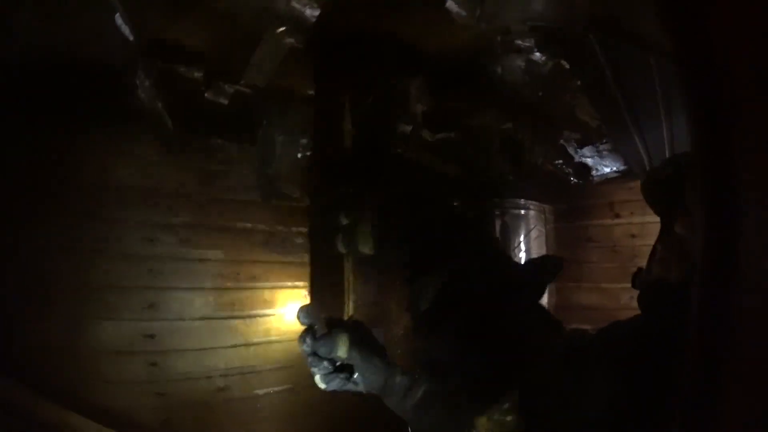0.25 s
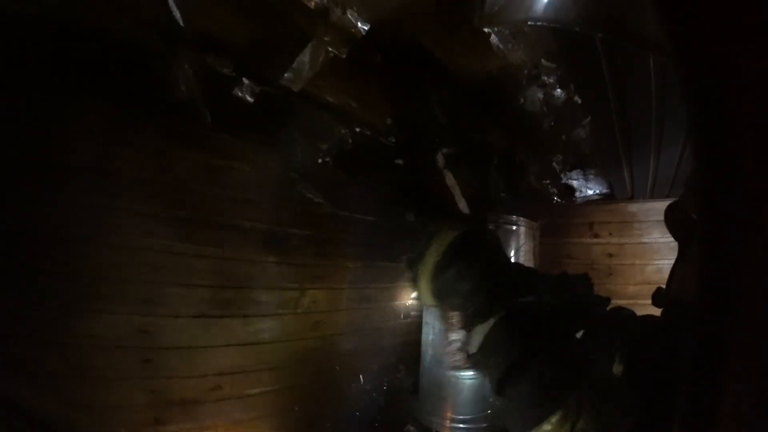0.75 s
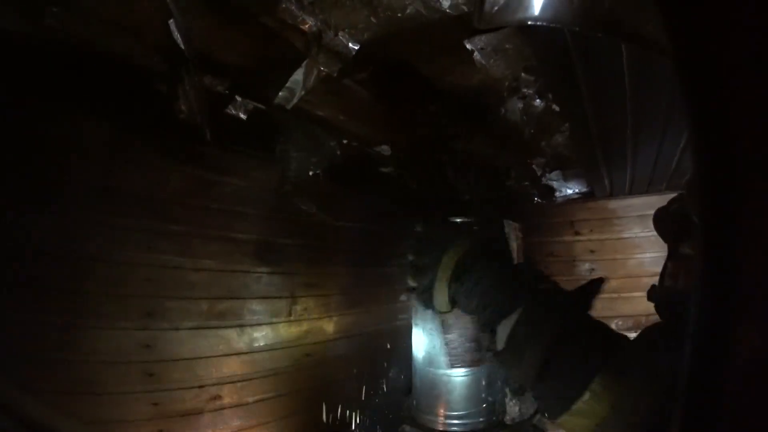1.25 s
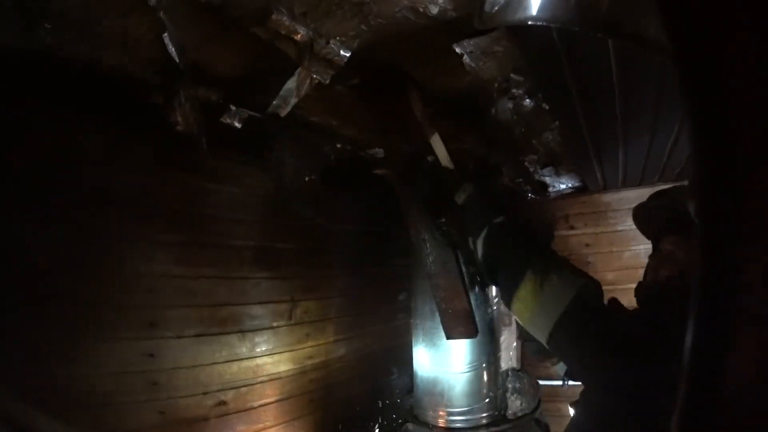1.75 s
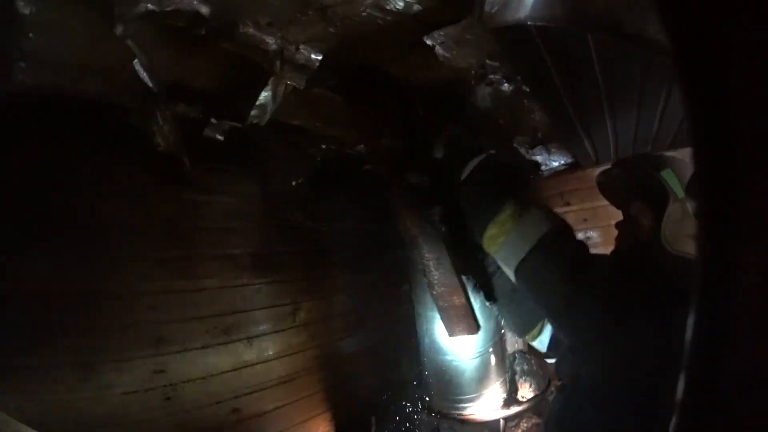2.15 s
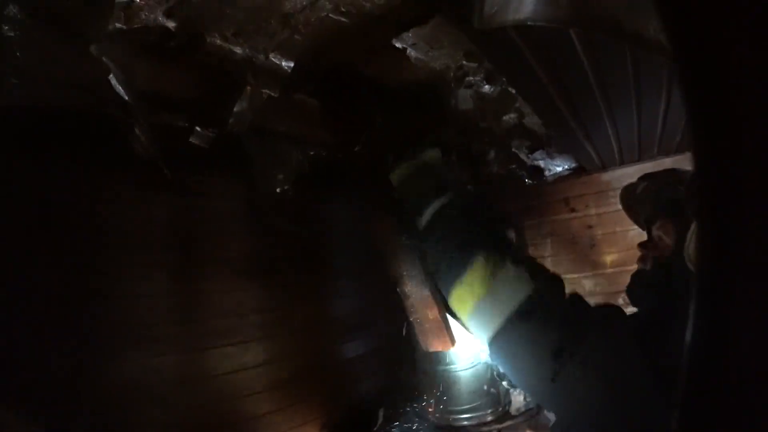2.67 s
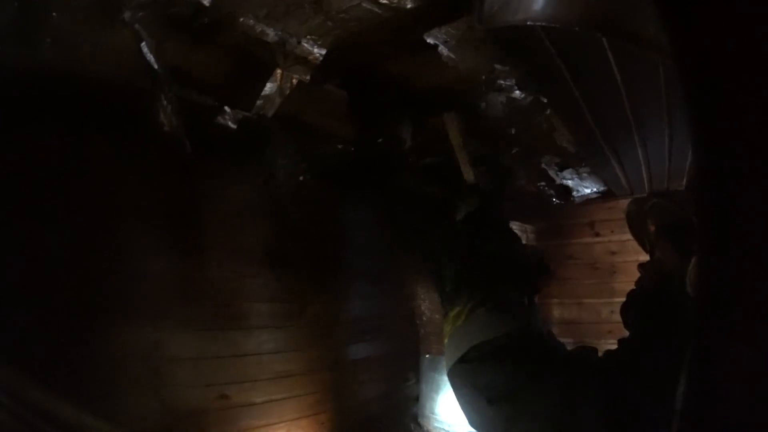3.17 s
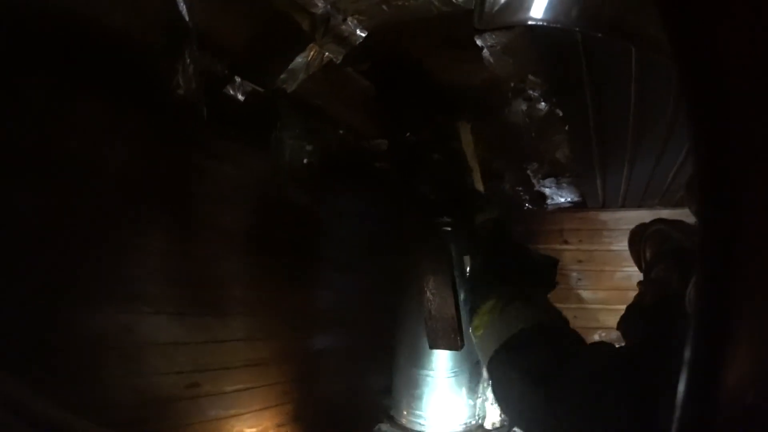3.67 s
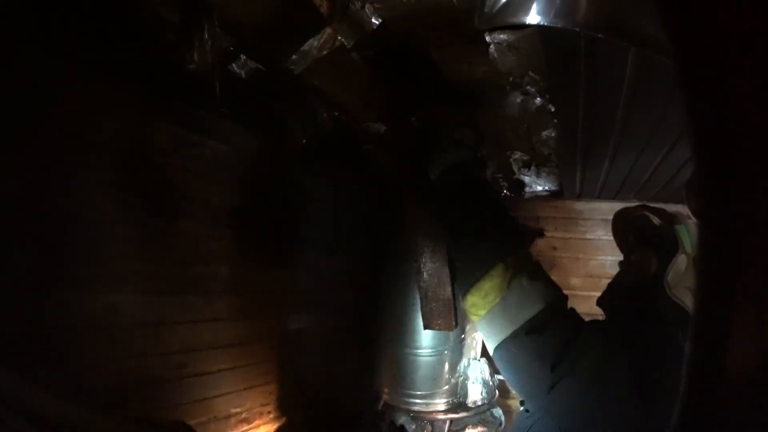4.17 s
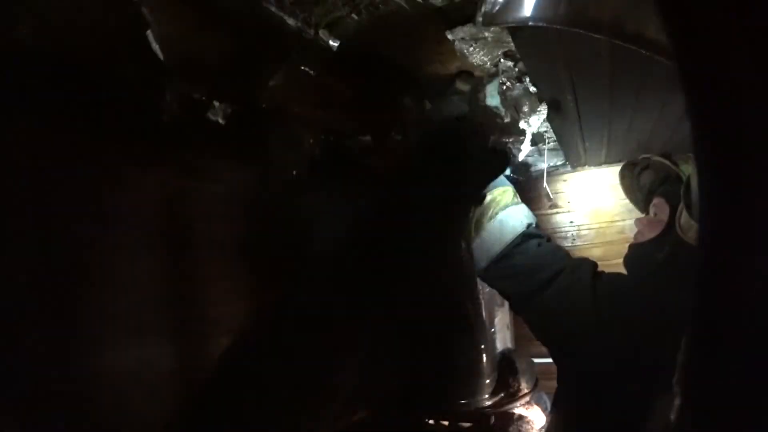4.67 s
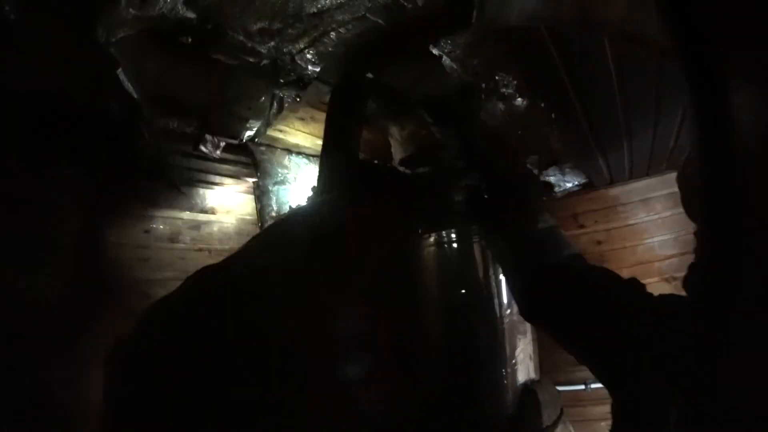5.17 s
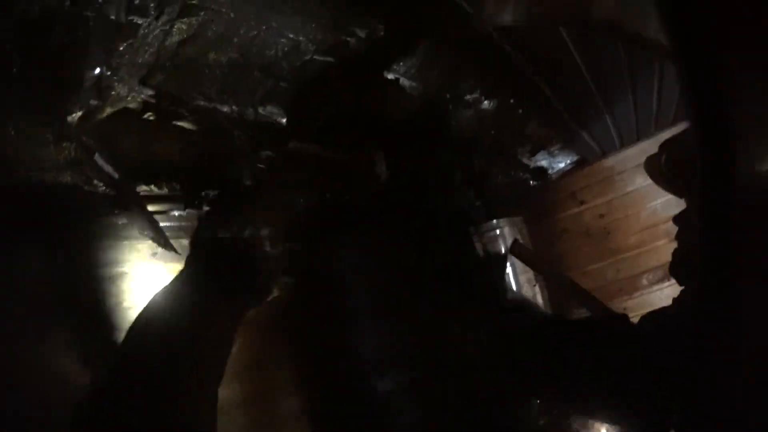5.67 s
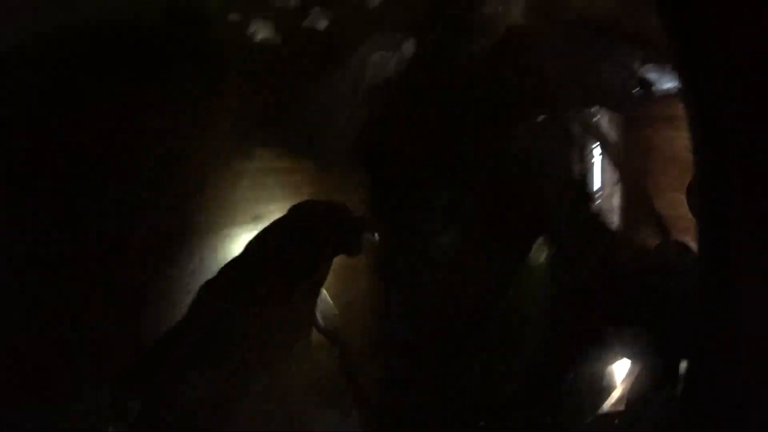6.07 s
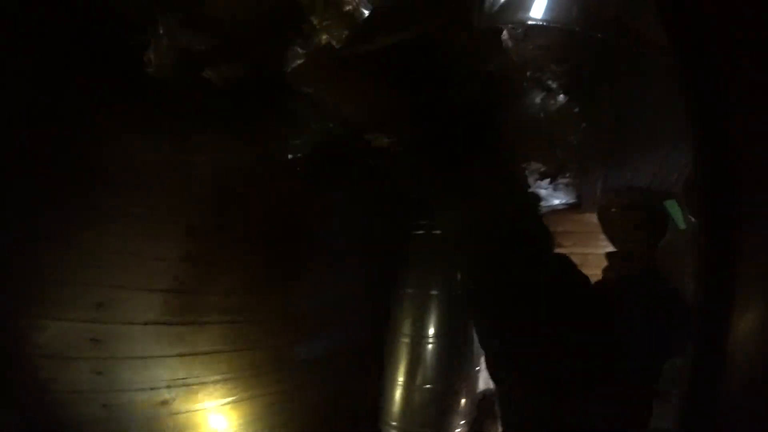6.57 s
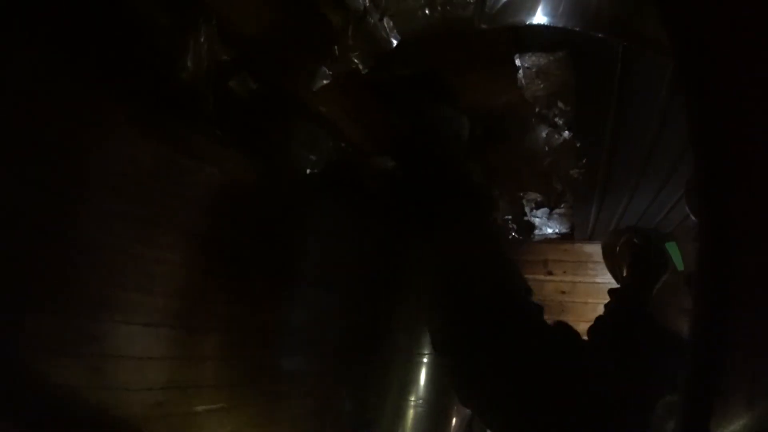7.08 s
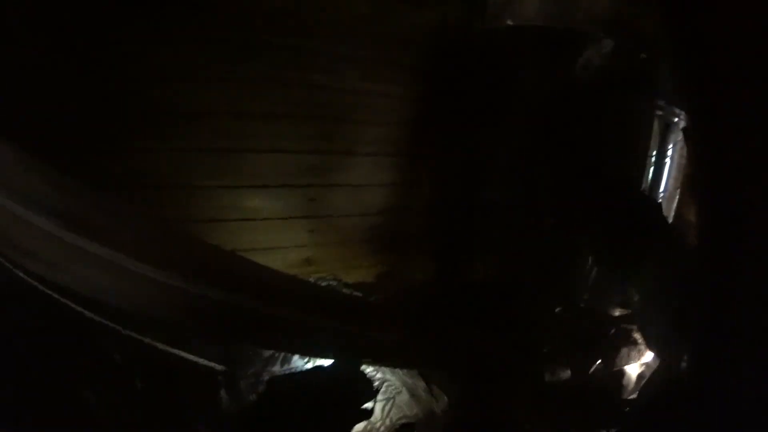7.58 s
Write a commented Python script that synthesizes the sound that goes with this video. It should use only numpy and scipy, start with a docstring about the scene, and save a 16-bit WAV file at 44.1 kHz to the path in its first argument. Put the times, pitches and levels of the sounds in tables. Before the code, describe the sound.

In a small wood-lined room, heard from very close in stereo, heavy clothing rustles and fine grit trickles over a very faint low rumble. From 0 to 1 s, sharp splinter snaps, short tears and several moderate hollow axe knocks come quickly. Between 1 and 3 s it is sparser: cloth swishes, tiny cracks, a few soft muffled knocks. Around 3.4 and 3.8 s wood crackles and scrapes again, then a strong deep thump with a snap hits at 4.06 s. After a short lull, bright snaps gather from 4.7 s, with loud splintering at 5.1 to 5.5 s and the heaviest double blow at 5.6 s. From 5.95 to 7 s, clattering knocks, rasping tears and ticking chips crowd together with louder rustling. It then thins to one weak knock at 7.3 s and a brief tear near 7.8 s. Each wood sound has close early echoes and a quick, dense tail.

```python
"""Heavy clothing rustles and grit trickles over a faint rumble, while wood snaps, tears and is knocked with an axe
throughout. A worker pries at the nailed boards of a ceiling in a small wood-lined room, heard from close by.
Rustling is many tiny random contacts; snaps are very short noise bursts; tears are clumps of tiny jerks.
Knocks add the decaying notes of joists and boards to a clattering contact and a short hollow tock.
Early echoes and a dense, fading room tail follow every wood sound."""
import sys
import numpy as np
from scipy import signal
from scipy.fft import next_fast_len
from scipy.io import wavfile
from scipy.ndimage import uniform_filter1d

SR = 44100
rng = np.random.default_rng(int(sys.argv[2]) if len(sys.argv) > 2 else 0)


def inscribe(sig):
    """Save sig as 16-bit PCM at rate SR to the path in sys.argv[1].

    A 1-D sig is mono; a 2-D sig holds one channel per row.
    Samples are clipped to [-1, 1] before scaling.
    """
    pcm = np.round(np.clip(np.atleast_2d(sig).T, -1, 1) * 32767)
    wavfile.write(sys.argv[1], SR, pcm.astype(np.int16))


N = 345303  # length in samples


def amp(db):
    """Turns decibels into a plain multiplier."""
    return 10 ** (np.asarray(db) / 20)


def rms(x):
    """The average strength of a sound, kept just above zero so that we can divide by it."""
    return np.sqrt(np.mean(x ** 2) + 1e-20)


def read(points, hz):
    """A spectrum's value at hz; the frequency axis is logarithmic, as pitch is to the ear."""
    f, value = np.transpose(points)
    return np.interp(np.log(hz + 1), np.log(f + 1), value)


def along(curve, s, column=1):
    """The value at time s of a curve that changes over time."""
    points = np.transpose(curve)
    return np.interp(s, points[0], points[column])


def add(mix, s, sound):
    """Adds a stereo sound to the mix at time s, cut off at the end of the mix."""
    part = mix[:, max(round(s * SR), 0):][:, :sound.shape[1]]
    part += sound[:, :part.shape[1]]


def response(points, size=4096):
    """The short click that carries a colour: its energy comes as early as the colour allows."""
    log_gain = np.log(amp(read(points, abs(np.fft.fftfreq(size, 1 / SR)))))
    spectrum = np.exp(np.conj(signal.hilbert(log_gain)))
    return np.fft.ifft(spectrum).real[:size // 2]


def colour(x, points):
    """Filters a sound so that its bass, middle and treble follow the colour's levels."""
    return signal.fftconvolve(x, response(points))[:len(x)]


def grains(n, per_s, spread_db, largest=4):
    """Tiny fractures or contacts at random moments; with a positive spread a few are much larger than the rest."""
    chance, size, sign = rng.random(n), rng.exponential(1, n), rng.choice([-1, 1], n)
    happens = chance < per_s / SR
    return happens * sign * amp(spread_db * np.minimum(size, largest))


def ports(x, side_db):
    """Two ears: side_db makes the left louder; the left also leads in phase, more so beyond 1 dB to its side."""
    z = signal.hilbert(x, next_fast_len(len(x)))[:len(x)]
    lead = .25 + .16 * max(side_db - 1, 0)  # radians
    turn = np.exp(.5j * lead) * amp(side_db / 2)
    return np.array([(z * turn).real, (z / turn).real])


def rub(level_db, points, per_s, spread_db, flutter_db, apart, side_db):
    """Many small contacts under a level that flutters as cloth folds and slides."""
    flutter = uniform_filter1d(rng.standard_normal(N), size=900)
    flutter = uniform_filter1d(flutter, size=500)
    drive = amp(flutter_db * flutter / rms(flutter))
    near, wide = (colour(grains(N, per_s, spread_db) * drive, points) for _ in range(2))
    centre = ports(near / rms(near), side_db)
    sides = apart * np.array([[1], [-1]]) * wide / rms(wide)  # opposite left and right: sounds wide
    return amp(level_db) * (centre + sides)


# Clothing and grit as the worker moves, before the gains in rustle: [t/s, swish level/dB, low body level/dB]
CLOTH_MOVES = [(0.0, -39.5, -44.5), (0.5, -42, -52), (0.67, -39, -42), (1.26, -44, -53.5),
               (1.63, -50.5, -57), (2.09, -44.5, -50.5), (2.2, -48, -53), (3.05, -44.5, -53.5),
               (3.62, -52, -59), (3.81, -49.5, -55), (3.97, -43, -46.5), (4.14, -50.5, -49.5),
               (4.4, -45, -51), (4.78, -35.5, -46.5), (5.19, -39, -53), (5.49, -34.5, -41),
               (5.63, -40.5, -43), (5.89, -40.5, -40.5), (6.15, -35, -30.5), (6.3, -41.5, -43),
               (6.52, -37.5, -43.5), (6.76, -40.5, -33), (7.13, -42.5, -49.5), (7.83, -46.5, -51.5)]
# Colour of the high swish: [f/Hz, level/dB]
SWISH_COLOUR = [(500, -34), (1800, -39), (3000, -7.5), (4200, 0), (6400, 4), (7800, -0.5), (11000, -6)]
# Colour of the low, soft part of the cloth sound: [f/Hz, level/dB]
CLOTH_BODY_COLOUR = [(20, -23), (45, -8.5), (80, -8.5), (140, -4.5), (210, -6.5), (300, -0.5), (350, -2),
                     (450, -20), (800, -20.5), (2000, -45)]
# Colour of the rubbing, also that of boards scraping in a tear: [f/Hz, level/dB]
RASP_COLOUR = [(300, -34.5), (480, -2.5), (600, -1), (900, -1), (1230, 2), (1500, 0), (1880, 1),
               (2300, -3.5), (3000, -0.5), (4500, -12.5), (10000, -25)]


def rustle(swish_gain_db=-0.5, body_gain_db=2.0, rub_gain_db=-3, rub_weight=0.29):
    """Clothing swishes high, rubs in the middle and rustles softly low, while grit trickles from the ceiling."""
    t = np.arange(N) / SR
    swish_db, body_db = along(CLOTH_MOVES, t), along(CLOTH_MOVES, t, column=2)
    # the rubbing follows both levels; rub_weight is the share that follows the body
    rub_db = swish_db + rub_weight * (body_db - swish_db) + rub_gain_db
    swish = rub(swish_db + swish_gain_db, SWISH_COLOUR, per_s=9000, spread_db=1.5,
                flutter_db=2.5, apart=0.4, side_db=0.0)
    rubbing = rub(rub_db, RASP_COLOUR, per_s=5000, spread_db=-0.5,
                  flutter_db=2.66, apart=0.67, side_db=-1.0)
    body = rub(body_db + body_gain_db, CLOTH_BODY_COLOUR, per_s=2700, spread_db=3.0,
               flutter_db=1.6, apart=.12, side_db=1.05)
    return swish + rubbing + body


def rumble(db=-62):
    """A faint, steady low rumble: random noise with little treble, different in each ear."""
    low = [(15, 6), (45, -11), (120, -15.0), (300, -4), (900, -59)]  # f/Hz, level/dB
    x = np.array([colour(rng.standard_normal(N), low) for _ in range(2)])
    return amp(db) * x / rms(x)


def small_snaps(per_s=5.2, above_db=15, spread_db=0.5):
    """Lesser fibres break at random moments, louder while the worker moves more: [t/s, level/dB]."""
    draws = rng.random((200, 2))[:round(per_s * N / SR)]
    s = draws[:, 0] * N / SR
    level_db = along(CLOTH_MOVES, s) + above_db + spread_db * (2 * draws[:, 1] - 1)
    return list(zip(s, level_db))


# The loudest splinters snapping, peaks before the gain in snaps: [t/s, level/dB]
LOUD_SNAPS = [(.0584, -19.5), (.113, -14.5), (.168, -11.5), (.2769, -18), (.2962, -14.5), (.3855, -18.5),
              (.598, -20), (2.605, -31), (2.7819, -20.5), (2.8799, -30), (2.9476, -24), (3.054, -21),
              (3.418, -12), (3.4444, -18), (4.0579, -8.5), (4.4192, -25), (4.6559, -13.5), (4.6643, -15),
              (4.8193, -10.5), (4.9392, -15.5), (4.9724, -17.5), (5.1118, -3.5), (5.129, -9), (5.153, -5.5),
              (5.1637, -13), (5.2949, -6), (5.322, -11.5), (5.3401, -7.5), (5.357, -23), (5.3876, -9.5),
              (5.481, -6.5), (5.5205, -8.5), (5.6335, -12), (5.6952, -11.5), (5.8809, -16), (5.9206, -10.5),
              (5.9898, -9.5), (6.3387, -18), (6.4982, -5), (6.8019, -17.5), (7.3165, -23)]


def snaps(level_db=2.5, break_s=0.00086, loud_db=-5, slowing=0.4, after_db=-15, after_s=0.011):
    """A strong fibre breaks in about a millisecond, high and thin, a weak one more slowly; neighbours follow faintly."""
    out, t = np.zeros((2, N)), np.arange(2 ** 11) / SR
    thin = [(300, -68), (1200, -16), (2500, -13.5), (3800, -4.5), (4900, 1),
            (6400, 1.5), (7800, -3.5), (9300, -3.0), (11000, -7)]  # f/Hz, level/dB
    for s, db in list(LOUD_SNAPS) + small_snaps():
        fade_s = break_s * amp(slowing * (loud_db - db))
        crack = rng.standard_normal(len(t)) * np.exp(-t / fade_s)
        after = rng.standard_normal(len(t)) * amp(after_db) * np.exp(-t / after_s)
        x = colour(crack + after, thin)
        add(out, s + 0.00077, ports(amp(db + level_db) * x / abs(x).max(), -.3))
    return out


# Natural notes of joists (deepest), bending boards and the boards' upper ring,
# before small random shifts: [f/Hz, level/dB, time to fade by 60 dB/s]
WOOD_MODES = [(64, -18, 0.48), (87.8, -7, 0.25), (112.4, 5, 0.12), (142.8, 4, 0.18), (181.4, 1.5, 0.24),
              (216, -4, 0.2), (248.4, 0.5, 0.19), (282.8, -3, 0.19), (313.5, -0.5, 0.16), (350.7, -7, 0.17),
              (415, -10, 0.1), (530, -5, 0.1), (590, -3, 0.11), (787, -3.5, 0.075), (937, -1.5, 0.091),
              (1098, -2, 0.11), (1174, 0.5, 0.078), (1270, 0.5, 0.13), (1388, -5, 0.21), (1645, 2.5, 0.054),
              (1913, 5.5, 0.057), (2590, -4.5, 0.05), (2955, -2, 0.082)]


def board(t, detune=0.018, uneven_db=1.5):
    """Deep, middle and upper notes of the wood; each place struck tunes and weights them a little differently."""
    hz, db, t60 = np.transpose(WOOD_MODES)[:, :, None]
    shift, weight, phase = rng.standard_normal((3, len(hz), 1))
    fading = amp(db + uneven_db * weight - 60 * t / t60)
    modes = fading * np.sin(2 * np.pi * (hz * (1 + detune * shift) * t + phase))
    family = np.digitize(hz[:, 0], [200, 480])  # borders in Hz between deep, middle and upper
    return [modes[family == k].sum(0) for k in range(3)]


def ringing(force, points, share):
    """A force heard through a broad colour and through the board's upper notes."""
    broad = colour(force, points)
    upper = board(np.arange(len(force)) / SR)[2]
    narrow = signal.fftconvolve(force, upper)[:len(force)]
    return broad / rms(broad) + share * narrow / rms(narrow)


# Wood tearing and scraping, levels before the gains in tears:
# [start t/s, end t/s, fibre crackle level/dB, board rasp level/dB, lift of thick splinters level/dB]
WOOD_TEARS = [(0.113, 0.169, -31, -39.5, 2), (0.338, 0.413, -40, -47, 3), (0.599, 0.615, -28.5, -36, -5),
              (0.814, 0.852, -23.5, -32.5, 0), (.894, 0.949, -35, -43.5, 3), (1, 1.024, -39.5, -45.5, 3),
              (1.469, 1.485, -39, -49, 15), (1.53, 1.555, -32, -43.5, 1), (2.369, 2.449, -41.5, -55, 0),
              (3.053, 3.173, -39, -48, -3.5), (3.348, 3.375, -31, -46, 0), (3.387, 3.48, -32, -45, 0),
              (3.765, 3.792, -24, -37, 3), (3.801, 3.883, -31, -39.5, 12.5), (3.878, 3.924, -25, -40, 9.5),
              (4.715, 4.762, -29.5, -51, -4.5), (4.797, 4.842, -33.5, -39.5, 16),
              (5.07, 5.111, -29.5, -41.5, 5), (5.106, 5.177, -23, -31, 8.5), (5.179, 5.288, -33, -50, 0),
              (5.475, 5.542, -29, -32, 9), (5.549, 5.593, -21.5, -31, 4.5), (5.686, 5.705, -31, -54, -1),
              (5.957, 5.998, -29.5, -23.5, 8), (6.096, 6.205, -29, -23.5, 5),
              (6.311, 6.377, -52, -37.5, -11), (6.5, 6.616, -32.5, -31, 9), (6.661, 6.679, -28, -32, 0),
              (6.71, 6.732, -30.5, -21.5, 12), (6.741, 6.91, -40.5, -36.5, 10),
              (6.917, 6.971, -32, -38, 6.5), (6.985, 7.006, -32, -42, 3), (7.78, 7.821, -29.5, -35, 8)]
# Colour of breaking fibres: [f/Hz, level/dB]
FIBRE_COLOUR = [(300, -26), (1000, -16), (2200, -6), (3100, -4.5), (3900, -4.5), (5000, -1), (6400, 4.5),
                (7700, -2.5), (9500, -4), (11000, -10)]
# Colour of the shuddering joists: [f/Hz, level/dB]
SHUDDER_COLOUR = [(25, -20), (60, -2), (115, -4.5), (150, -1), (200, -2), (280, 1.5), (340, 3),
                  (450, -18.5), (700, -23), (2000, -52)]
# Where the work lies, left positive; tears use it for the shudder, knocks for each blow: [t/s, left-right level/dB]
WORK_SIDE = [(0, .5), (3.7, 0), (4.1, 2.5), (5.1, -2), (5.6, 3), (6.15, 3.5), (6.5, 1.7), (7.8, 1)]


def tears(rise=0.0011, release=0.006, linger=0.05, sag_db=3.0, clump_db=2.5, crackle_db=-1, rasp_db=-4.5,
          shudder_db=-3, thick_hz=3050, thick_octaves=0.77, uneven_db=3.0):
    """Fibres give way in clumps; the same jerks rasp the board and shudder the joists; long tears fade more slowly."""
    out, t = np.zeros((2, N)), np.arange(2 ** 13 + 2 ** 12) / SR
    hz = np.geomspace(100, SR / 2, num=80)
    thick = np.exp(-(np.log2(hz / thick_hz) / thick_octaves) ** 2)
    for start, end, fibre_db, board_db, thick_db in WOOD_TEARS:
        length = max(end - start, .01)
        clumps = uniform_filter1d(rng.standard_normal(len(t)), size=200)
        strain = 1 - np.exp(-t / rise)
        strain *= np.exp(-np.maximum(t - length, 0) / (release + linger * length))
        strain *= amp(clump_db * clumps / rms(clumps) - sag_db * t / length)
        jerks = strain * grains(len(t), per_s=4200, spread_db=2.5)
        # each break has its own resonances
        splinters_db = thick_db * thick + uneven_db * rng.standard_normal(len(hz))
        crackle = colour(jerks, np.column_stack([hz, read(FIBRE_COLOUR, hz) + splinters_db]))
        rasp = ringing(jerks, RASP_COLOUR, share=0.65)
        shudder = colour(jerks, SHUDDER_COLOUR)
        for x, db, side_db in ((crackle, fibre_db + crackle_db, -.7),
                               (rasp, board_db + rasp_db, -.5),
                               (shudder, board_db + shudder_db, along(WORK_SIDE, start))):
            add(out, start, ports(amp(db) * x / rms(x[t < length]), side_db))
    return out


def note(t, db, hz, t60=0.066, split=0.066, rise=0.00059, early=0.01):
    """A piece's own note: three close tones that beat and die fast, a short hollow tock."""
    ratio, size = 1 + split * np.array([[-1], [0], [1]]), np.array([[.5], [1], [.5]])
    x = (size * np.sin(2 * np.pi * (hz * ratio * t + rng.random((3, 1))))).sum(0)
    x = x * amp(-60 * t / t60) * (1 - np.exp(-t / rise))
    return amp(db) * x / rms(x[t < early])


def chips(per_s=40, level_db=-7, spread_db=6.0, low_hz=650, high_hz=2300):
    """Chips break off while wood tears; each ticks against the boards at its own pitch, from its own side."""
    out, t = np.zeros((2, N)), np.arange(2 ** 12) / SR
    for start, end, _, board_db, _ in WOOD_TEARS:
        draws = rng.random((20, 4))
        count = round(per_s * max(end - start, 0))
        for place, pitch, size, side in draws[:count]:
            hz = low_hz * (high_hz / low_hz) ** pitch
            tick = note(t, board_db + level_db + spread_db * (2 * size - 1), hz)
            add(out, start + place * (end - start), ports(tick, 10 * (side - .5)))
    return out


def thud(t, knock_db, boom_db, contact=0.0054, joist_lag=0.01, early=0.032):
    """The board takes a few milliseconds to bend; the heavy joists build up more slowly."""
    boom, knock, _ = board(t)
    boom = boom * np.sin(np.pi / 2 * np.minimum(t / joist_lag, 1)) ** 2
    knock = knock * np.sin(np.pi / 2 * np.minimum(t / contact, 1)) ** 2
    return amp(boom_db) * boom / rms(boom[t < early]) + amp(knock_db) * knock / rms(knock[t < early])


# Colour of the hard, clattering contact: [f/Hz, level/dB]
CLACK_COLOUR = [(300, -19), (480, -7), (590, 1.5), (680, -1.5), (790, -1.5), (960, -5), (1200, -3),
                (1550, -4), (1880, 0.5), (2250, -6), (2800, -4), (4500, -12), (7000, -13), (11000, -29)]


def clack(t, db, hardness_db, t60=0.093, early=0.015):
    """A chattering contact sets off the upper notes; lower hardness gives less treble, as soft, damp wood does."""
    contact = grains(len(t), 5000, 2.6) * amp(-60 * t / t60) * (1 - np.exp(-t / 0.0014))
    x = ringing(contact, CLACK_COLOUR, share=0.47)
    x = colour(x, [(20, 0), (1000, 0), (4000, 4 * hardness_db), (11000, 3 * hardness_db)])
    return amp(db) * x / rms(x[t < early])


# Blows on wood, levels before the gains in knocks:
# [t/s, knock level/dB, deep boom level/dB, clack level/dB, struck piece's note f/Hz, note level/dB]
BLOWS = [(.168, -21, -37, -26, 1154, -29), (.469, -27.5, -45, -39, 1150, -40),
         (.522, -26.5, -53, -30.5, 760, -33), (.588, -31, -37, -50, 1570, -44),
         (.712, -25, -34, -32.5, 1237, -33), (.817, -28.5, -28, -42, 1110, -48),
         (1.536, -34, -40, -42, 1613, -37), (1.6, -38.5, -35.5, -57, 1120, -60),
         (1.945, -42.5, -42, -45, 626, -53), (2.127, -33, -28.5, -47.5, 1150, -54),
         (2.535, -49, -62, -38, 786, -36), (3.35, -32.5, -35, -47, 1250, -50),
         (3.772, -30.5, -38, -51, 1240, -43), (4.059, -12, -14.5, -27.5, 454, -20),
         (4.132, -51, -36, -32, 850, -39), (5.474, -22, -28.5, -24.5, 1840, -29),
         (5.598, -9.5, -20.5, -21.5, 817, -23.5), (5.622, -11, -17, -28.5, 556, -28),
         (5.967, -33, -36, -20, 1117, -31), (6.0, -25, -23, -29, 1112, -29),
         (6.113, -25, -15.5, -18, 1130, -27), (6.135, -20, -19.5, -19, 1114, -28),
         (6.168, -23, -32, -16.5, 930, -20), (6.198, -19, -25.5, -29.5, 812, -24.5),
         (6.303, -47, -42, -26.5, 1530, -31), (6.499, -43, -55, -33, 1150, -26.5),
         (6.545, -28.5, -29.5, -39, 1281, -41), (6.588, -30, -34, -30, 1397, -32),
         (6.714, -19.5, -27, -24, 750, -30), (6.8, -23.5, -27, -46, 745, -42),
         (6.88, -25.5, -26.5, -54, 1813, -51), (6.959, -52, -35, -34.5, 826, -35.5),
         (6.989, -52, -54, -35, 1270, -34), (7.314, -32, -45, -40.5, 1200, -51)]
# Every blow lands a second time, weaker and duller: delay in s, drop of the thud and of the clack in dB
REBOUND_S, REBOUND_DB, REBOUND_CLACK_DB = .023, -6.5, -14.5
# Treble setting at the reference knock level (both dB), and how much it falls per dB of harder knock
HARDNESS_DB, HEAVY_DB, DULLING = -3, -25.5, 0.18


def knocks(thud_db=-4.0, clack_db=-2.5, note_db=-2.0, clack_side_db=0.0):
    """The axe head and loose boards strike and rebound; heavier blows clack with less treble."""
    out, t = np.zeros((2, N)), np.arange(2 ** 14) / SR
    for s, knock_db, boom_db, db, ring_hz, ring_db in BLOWS:
        side_db = along(WORK_SIDE, s)
        hardness_db = HARDNESS_DB - DULLING * (knock_db - HEAVY_DB)
        for at, low_db, high_db in ((s, 0, 0), (s + REBOUND_S, REBOUND_DB, REBOUND_CLACK_DB)):
            low = amp(low_db + thud_db) * thud(t, knock_db, boom_db)
            high = clack(t, db + clack_db, hardness_db) + note(t, ring_db + note_db, ring_hz)
            add(out, at, ports(low, side_db) + ports(amp(high_db) * high, side_db + clack_side_db))
    return out


def walls(x, db=-12, first_s=.0012, last_s=.014):
    """The first few echoes, off the worker's arms and the nearest boards, differ in each ear."""
    at, sign = rng.random((2, 8)), rng.choice([-1, 1], (2, 8))
    taps = np.zeros((2, 2 ** 10))
    places = ((first_s + at * (last_s - first_s)) * SR).astype(int)
    np.put_along_axis(taps, places, sign / np.sqrt(8), 1)
    echoes = signal.oaconvolve(x, taps, axes=1)[:, :N]
    # small surfaces throw back only the shorter waves
    return amp(db) * signal.sosfilt(signal.butter(2, 900, "highpass", fs=SR, output="sos"), echoes)


# How long the room rings: [f/Hz, time to fade by 60 dB/s]
ROOM_FADE = [(100, 0.41), (300, 0.22), (800, 0.26), (2200, 0.21), (6000, 0.28), (11000, 0.17)]
# Strength of the room's tail: [f/Hz, level/dB]
ROOM_LEVEL = [(100, -15), (350, -14.5), (700, -11.5), (2200, -7.5), (6000, -12), (11000, -6)]


def room(x, gap=.004):
    """Close wooden walls: dense echoes, different in each ear, each band dying at its own speed."""
    n = SR // 2
    taps = rng.standard_normal((2, n)) * (rng.random((2, n)) < 3000 / SR)
    hz, t, z = signal.stft(taps, SR, nperseg=256)
    decay = amp(-60 * t / np.clip(read(ROOM_FADE, hz), .05, .6)[:, None])
    decay /= np.sqrt(np.mean(decay ** 2, axis=1, keepdims=True))
    shaped = z * decay * amp(read(ROOM_LEVEL, hz))[:, None]
    tail = signal.istft(shaped, SR, nperseg=256)[1] / np.linalg.norm(taps[0])
    delayed = np.pad(tail, ((0, 0), (round(gap * SR), 0)))
    return signal.fftconvolve(x, delayed, axes=1)[:, :N]


def scene():
    """The work on the ceiling, its echoes and room sound, the worker's clothing and the rumble."""
    wood = knocks() + tears() + snaps() + chips()
    return wood + walls(wood) + room(wood) + rustle() + rumble()


def record(dry, ceiling=0.64, edge_hz=11200):
    """Rounds off the loudest peaks, then removes the treble above edge_hz."""
    rounded = ceiling * np.tanh(dry / ceiling)
    lowpass = signal.firwin(401, edge_hz, window=("kaiser", 8), fs=SR)
    return signal.oaconvolve(rounded, lowpass[None], "same")


dry = scene()
out = record(dry)
inscribe(out)
```